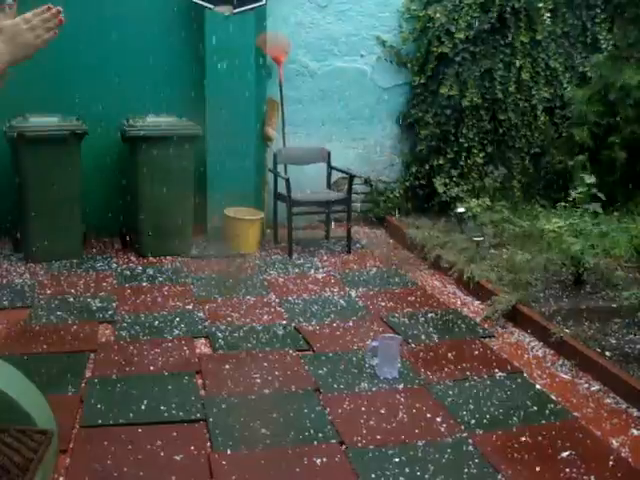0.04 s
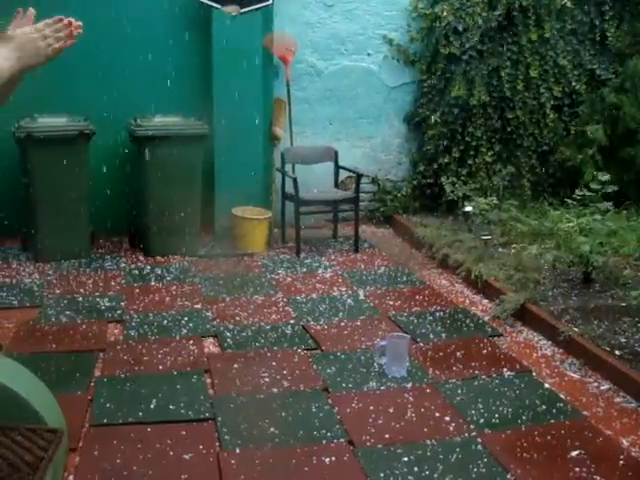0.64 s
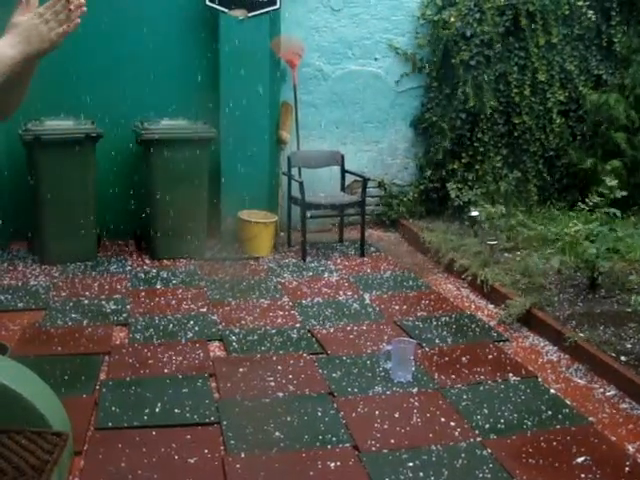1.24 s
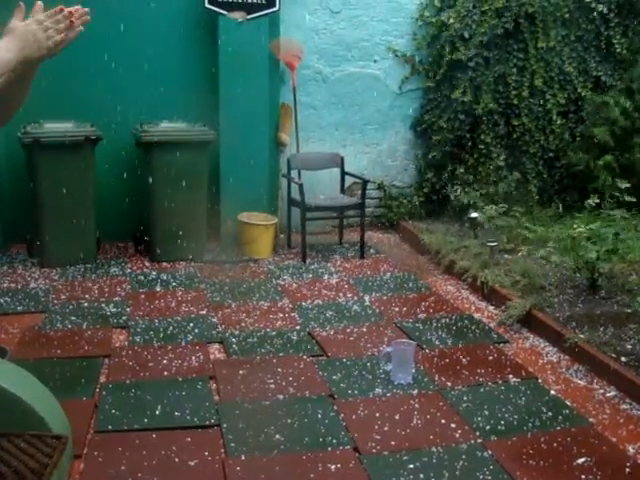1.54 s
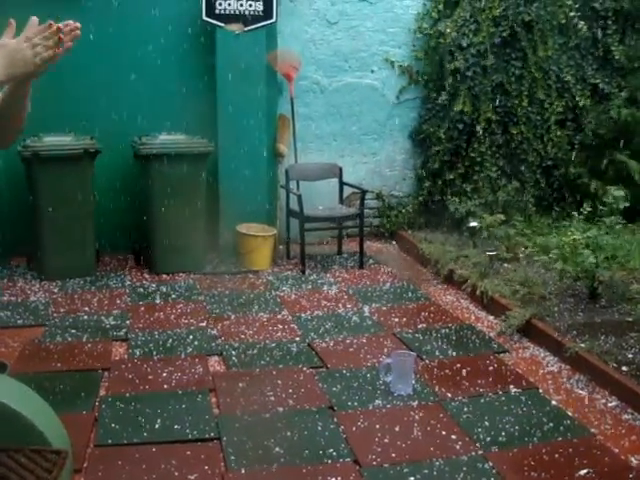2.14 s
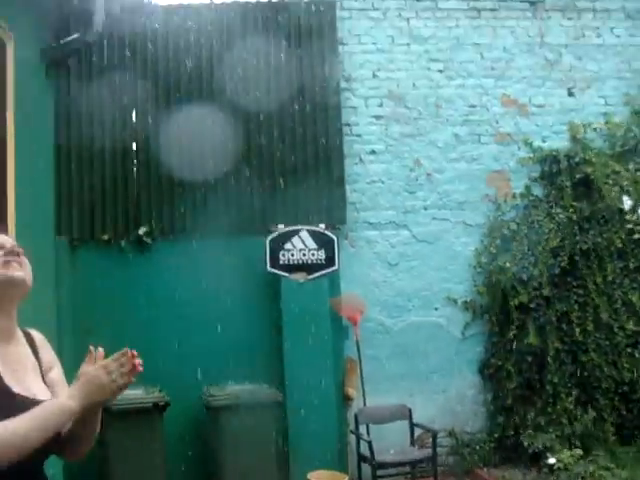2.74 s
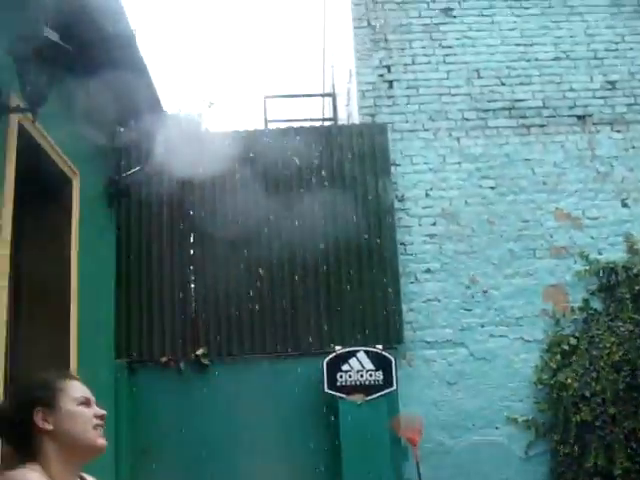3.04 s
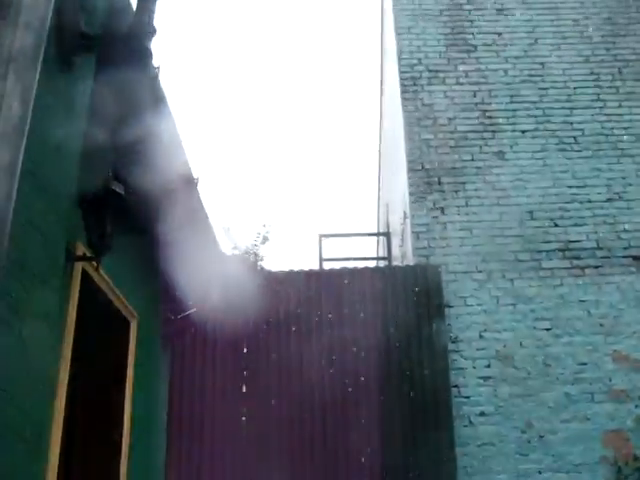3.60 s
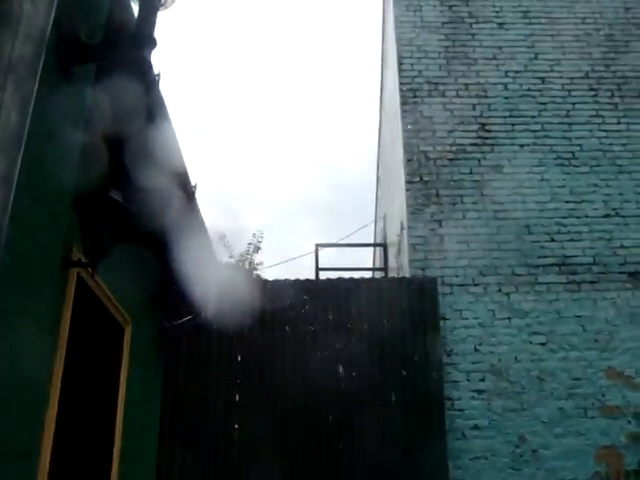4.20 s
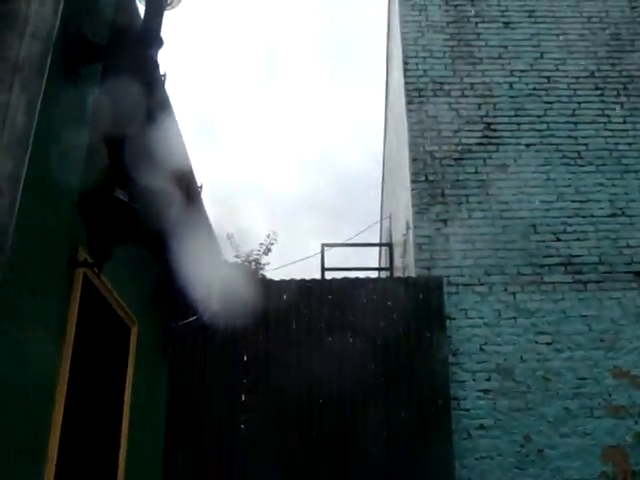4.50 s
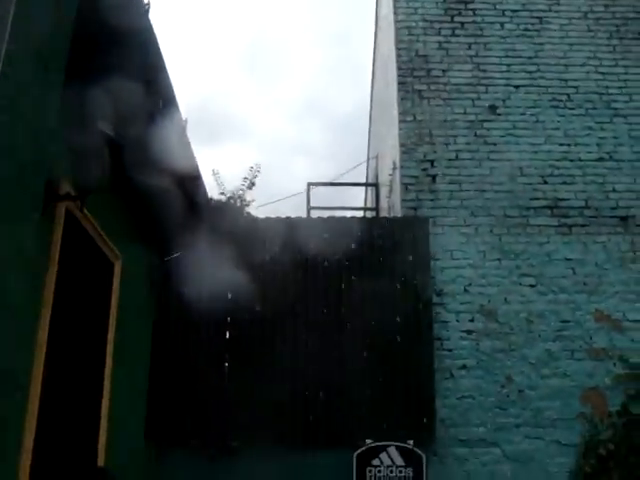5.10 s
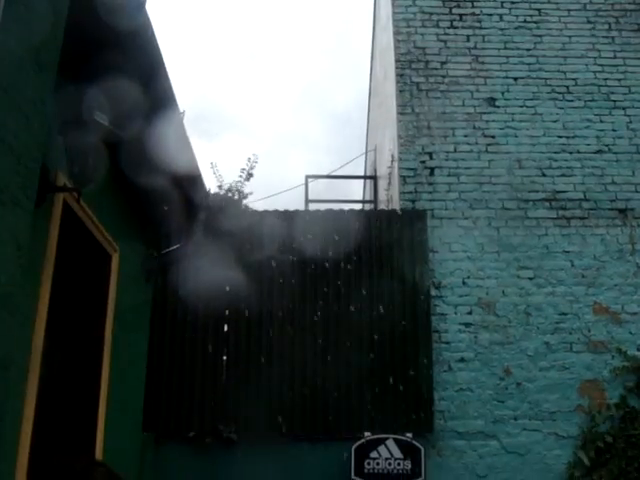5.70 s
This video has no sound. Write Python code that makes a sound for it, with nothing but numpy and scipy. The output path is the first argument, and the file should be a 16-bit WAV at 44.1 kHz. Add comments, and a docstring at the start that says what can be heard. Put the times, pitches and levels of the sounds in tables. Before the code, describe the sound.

Hail and rain fall steadily for the whole six seconds in a small walled courtyard, heard from under the eaves. Stones tick and shatter densely on the paving over a bright, wet spatter of drops, and the walls blur distant impacts into a wash. Underneath are softer hollow drumming on plastic bins and dull thuds on tiles and leaves. Larger stones crack sharply close to the microphone throughout, some with a small knock, clustering between 1 and 1.5 seconds and again from 4 to 5 seconds. Brief flurries add heavier patter around 1.3 to 2 seconds, near 4 and 5 seconds, and at about 5.7. Faint wind rumbles on the microphone, mostly in the first two seconds and again near 4.2. A thin, very high ring briefly peeks through the hiss at about 0.2 and 2.1 seconds. The overall level stays nearly even.

```python
"""Hail and rain in a small walled courtyard, heard in mono from a microphone under the eaves.
Stones tick and shatter on the paving, drum on plastic bins and thud on tiles and leaves; big ones
crack close by. Raindrops spatter in the wet, and the walls blur the far impacts into a wash.
A little wind rumbles on the microphone, and a thin high ring comes up twice."""
import sys
import numpy as np
from scipy import signal
from scipy.fft import rfft, irfft
from scipy.io import wavfile
from scipy.ndimage import uniform_filter1d

SR = 44100
rng = np.random.default_rng(int(sys.argv[2]) if len(sys.argv) > 2 else 0)


def master_out(mix):
    """Clip the mix to full scale and print it as 16-bit PCM to the path in sys.argv[1]."""
    frames = np.transpose(np.atleast_2d(mix))
    ceiling = np.clip(frames, -1, 1)
    pcm = np.round(ceiling * 32767).astype(np.int16)
    wavfile.write(sys.argv[1], SR, pcm)


N = 262395
T = np.arange(N) / SR


def undb(db):
    """Decibels to gain."""
    return 10 ** (np.asarray(db) / 20)


def unit(x):
    """Scale to rms 1."""
    return x / np.sqrt(np.mean(x ** 2))


def curves(table):
    """Each column after the first, which is time in seconds, as one value per sample."""
    times, *columns = np.transpose(table)
    return [np.interp(T, times, column) for column in columns]


def walk(rate):
    """Glide from one random level to the next, rate times a second; rms 1."""
    hold = max(int(SR / rate), 2)
    steps = np.repeat(rng.standard_normal(N // hold + 1), hold)
    return unit(uniform_filter1d(steps, hold)[:N])


def band(x, lo_hz, hi_hz, order=3):
    """Butterworth band-pass."""
    return signal.sosfilt(signal.butter(order, [lo_hz, hi_hz], "band", fs=SR, output="sos"), x)


def resonance(x, hz, width_hz):
    """Two-pole band-pass, gain 1 at the centre."""
    return signal.lfilter(*signal.iirpeak(hz, hz / width_hz, fs=SR), x)


def colour(x, points, size=2048):
    """Minimum-phase filter through (Hz, dB) points, so that clicks keep their sharp front."""
    hz, db = np.transpose(points)
    grid_hz = np.maximum(np.fft.rfftfreq(size, 1 / SR), 1)
    gain = undb(np.interp(np.log(grid_hz), np.log(hz), db))
    cepstrum = irfft(np.log(gain))
    cepstrum[1:size // 2] *= 2
    cepstrum[size // 2 + 1:] = 0
    response = irfft(np.exp(rfft(cepstrum)))
    return signal.fftconvolve(x, response)[:N]


def fade(x, t60):
    """Energy that jumps with each hit in x, then falls 60 dB in t60 seconds."""
    keep = np.exp(-2 * np.log(1000) / (t60 * SR))
    return signal.lfilter([1 - keep], [1, -keep], x ** 2)


def impacts(rate, spread_db, range_db):
    """Random hits, rate a second; the nearest stand up to range_db above the farthest."""
    lands = rng.random(N) < rate / SR
    nearness = rng.exponential(size=N)
    sign = rng.choice([-1, 1], N)
    return lands * sign * undb(range_db * np.tanh(spread_db * nearness / range_db))


def courtyard(x, t60, wet_db):
    """Every impact lands elsewhere, so the walls answer each with a different diffuse tail."""
    return unit(x + undb(wet_db) * np.sqrt(fade(x, t60)) * rng.standard_normal(N))


def hail(rate_per_band=1500, waver_db=1.0, shatter_db=-3.0, bands=8):
    """Stones tick on the paving, small ones higher, each size wavering on its own; some shatter."""
    # Tone of the paving. Each row: frequency in Hz, gain in dB.
    paving = [(300, -26), (800, -7), (1100, -5), (1700, -1.5), (2500, 1), (3600, -1.5), (4800, -2.5),
              (6000, -11), (10000, -35)]
    ticks, edges_hz = 0, np.geomspace(600, 9000, bands + 1)
    for lo, hi in zip(edges_hz, edges_hz[1:]):
        hits = impacts(rate_per_band, spread_db=4.5, range_db=13.5) * undb(waver_db * walk(70))
        ticks += band(courtyard(hits, t60=0.48, wet_db=-2), lo, hi)
    breaks = fade(impacts(330, spread_db=1.0, range_db=14.5), t60=0.054)
    chips = unit(impacts(9000, spread_db=1.0, range_db=10) * np.sqrt(breaks))
    return unit(colour(ticks + undb(shatter_db) * chips, paving))


def rain(droplet_rate=9000, splash_t60=0.016, big_db=-4, bands=6):
    """Each splash throws a dying burst of droplets; small ones keep to one band, big ones cover all."""
    # Tone of drops in the wet. Each row: frequency in Hz, gain in dB.
    spatter = [(2000, -7.5), (3600, -13.5), (4700, -4), (5800, -2.5), (7300, 1), (8400, -2), (9800, -3),
               (11000, -27.5)]
    splashes, edges_hz = 0, np.linspace(3200, 10400, bands + 1)
    big = fade(unit(impacts(420, spread_db=23, range_db=17.5)), splash_t60)
    for lo, hi in zip(edges_hz, edges_hz[1:]):
        small = fade(unit(impacts(300, spread_db=4.0, range_db=1.0)), splash_t60)
        bursts = np.sqrt(small + undb(big_db) * big)
        droplets = impacts(droplet_rate, spread_db=4.0, range_db=10.0) * bursts
        splashes += band(unit(droplets), lo, hi)
    return unit(colour(splashes, spatter))


def bins(rate_per_mode=600):
    """Hail drums on the hollow plastic bins; each spot on a lid favours other modes."""
    # Modes of the lids. Each row: frequency in Hz, width in Hz, relative gain in dB.
    lid_modes = [(516, 170, 1), (648, 130, 3.5), (767, 31, -3.5), (946, 92, -15)]
    lids = 0
    for hz, width_hz, db in lid_modes:
        hits = impacts(rate_per_mode, spread_db=4.0, range_db=14.5)
        lids += undb(db) * resonance(courtyard(hits, t60=0.19, wet_db=-0.5), hz, width_hz)
    return unit(lids)


def thuds(rate=450):
    """Hail lands in dull blows on tiles and leaves."""
    # Tone of the blows. Each row: frequency in Hz, gain in dB.
    dull_tone = [(45, -39.5), (80, -9.5), (120, -2.5), (190, 0.5), (260, 0.5), (340, -5), (500, -3.5),
                 (1000, -17.5)]
    hits = courtyard(impacts(rate, spread_db=2.0, range_db=19), t60=0.46, wet_db=-7.5)
    return unit(colour(hits, dull_tone))


def surges(slow_hz=5, fast_hz=24):
    """Quick random swells and lulls in the shower; rms 1."""
    return unit(band(rng.standard_normal(N), slow_hz, fast_hz, order=2))


def wind(buffet_db=2.0, buffet_rate=14):
    """Wind on the microphone: a low rumble in uneven buffets."""
    # Strength of the breeze. Each row: time in seconds, level in dB before the buffets.
    breeze = [(0, -52), (.28, -46), (.47, -55), (.85, -42.5), (1.0, -49), (1.38, -47), (1.62, -60),
              (1.8, -49), (2.15, -71), (3.0, -65), (4.2, -46.5), (4.5, -57), (5.55, -61), (5.95, -66)]
    # Tone of the rumble. Each row: frequency in Hz, gain in dB.
    rumble_tone = [(18, -33), (30, -10), (55, -8), (80, -1), (140, -3.5), (400, -40)]
    breeze_db, = curves(breeze)
    buffets = undb(breeze_db + buffet_db * walk(buffet_rate))
    return buffets * unit(colour(rng.standard_normal(N), rumble_tone))


def thin_ring(hz=8722, steady_db=-44, ramp_s=0.004):
    """A faint narrow ring high in the hiss, which briefly swells into a clear tone."""
    # Swells of the ring. Each row: start in seconds, length in seconds, peak in dB.
    swells = [(.2, .065, -22.5), (2.1, .04, -23)]
    ring = undb(steady_db) * unit(resonance(rng.standard_normal(N), hz, width_hz=35))
    for start, length, db in swells:
        gate = np.clip(np.minimum(T - start, start + length - T) / ramp_s, 0, 1)
        ring += undb(db) * gate * np.sin(2 * np.pi * hz * T)
    return ring


def big_stones(decay_s=0.0053, knock_s=0.0058, knock_hz=620, size=2048):
    """Close to the microphone a stone cracks, scatters chips and knocks the surface it lands on."""
    # Near stones. Each row: start in seconds, peak of the crack in dB, its pitch in Hz,
    # knock in dB relative to the crack.
    stones = [(.315, -16, 1750, -7), (.381, -12, 3000, -19), (.787, -9, 2000, -10.5),
              (1.021, -11, 3200, -20), (1.155, -12.5, 2040, -20), (1.195, -12, 2340, -22),
              (1.215, -8, 3200, -12), (1.304, -5, 7100, -24), (1.371, -7.5, 2820, -20),
              (1.496, -6, 2150, -10), (1.852, -13, 3470, -13), (1.994, -14, 2400, -7),
              (2.229, -11, 3190, -19), (2.496, -11, 2600, -17), (2.964, -10, 6500, -14),
              (3.085, -9.5, 2390, -11), (3.26, -11, 2330, -20), (3.483, -11, 2900, -20),
              (3.583, -10, 2670, -13), (3.98, -9, 2200, -18), (4.094, -11, 2970, -20),
              (4.25, -11, 2800, -13), (4.434, -6, 4500, -28), (4.517, -10, 7310, -22),
              (4.535, -7, 4300, -24), (4.748, -15.5, 1970, -7), (4.865, -7, 2630, -18),
              (5.003, -9, 2300, -17), (5.177, -12.5, 1830, -19), (5.708, -10, 2280, -18)]
    out, t = np.zeros(N + size), T[:size]
    for start, db, hz, knock_db in stones:
        chips = rng.standard_normal(size) * np.exp(-t / decay_s)
        crack = band(chips, 0.54 * hz, 1.3 * hz, order=2)
        crack /= np.abs(crack).max()
        surface_hz = knock_hz * rng.uniform(0.75, 1.25)
        knock = np.sin(2 * np.pi * surface_hz * t) * np.exp(-t / knock_s)
        at = int(start * SR)
        out[at:at + size] += undb(db) * (crack + undb(knock_db) * knock)
    return out[:N]


def flurries():
    """Clumps of hail land together, each a smooth hump; gives the extra dB of clatter and of thuds."""
    # Each row: centre in seconds, width in seconds, extra clatter in dB, extra thuds in dB.
    clumps = [(.69, 0.1, -1, 3), (1.29, .06, 0, 7.5), (1.384, .05, 1.8, 3), (1.518, 0.028, 0, 9),
              (1.858, 0.049, 3, 9.5), (1.994, .05, 4, 7), (3.57, 0.07, 0, 1.5), (3.95, 0.11, 1, 5.5),
              (4.083, 0.028, 1.5, 4), (4.43, 0.098, 2, 1), (4.98, .08, 0, 5), (5.57, .04, 1.5, 1),
              (5.73, 0.17, 1.4, 3)]
    extra_clatter_db, extra_thud_db = 0, 0
    for centre, width, clatter_db, thud_db in clumps:
        hump = 2 ** -((2 * (T - centre) / width) ** 2)
        extra_clatter_db += clatter_db * hump
        extra_thud_db += thud_db * hump
    return extra_clatter_db, extra_thud_db


def scene(hail_surge_db=0.65, rain_surge_db=0.5, thuds_below_db=13.5, thuds_fade_db_per_s=0.53):
    """The courtyard from under the eaves: one shower drives every surface; both channels are alike."""
    # How hard it comes down. Each row: time in seconds, then base levels in dB of hail, rain and bins.
    shower = [(0, -21, -24, -33), (.55, -20, -21.5, -33), (.82, -19.5, -23.5, -33),
              (.95, -22.5, -23.5, -35.5), (1.05, -20.5, -22.5, -31.5), (1.4, -21.5, -23.5, -34.5),
              (1.65, -22, -22.5, -35), (1.93, -23, -24.5, -33.5), (2.1, -21.5, -24, -33.3),
              (2.7, -20.5, -22.5, -34), (3.15, -20.5, -22, -32.4), (3.33, -22.3, -24, -37.7),
              (3.45, -19.5, -22, -34.5), (4.4, -20, -22.5, -32.5), (4.65, -21, -23.5, -34.5),
              (4.95, -19.5, -21.8, -32.6), (5.33, -21, -22, -34.6), (5.95, -20.5, -21.3, -34)]
    hail_db, rain_db, bins_db = curves(shower)
    extra_clatter_db, extra_thud_db = flurries()
    clatter = undb(hail_db + extra_clatter_db) * hail()
    spatter = undb(rain_db) * rain()
    drumming = undb(bins_db + 0.27 * extra_thud_db) * bins()  # the bins take a share of each flurry
    patter = undb(hail_db + extra_thud_db - thuds_below_db - thuds_fade_db_per_s * T) * thuds()
    surge = surges()
    hailfall = undb(hail_surge_db * surge) * (clatter + drumming + patter)
    rainfall = undb(rain_surge_db * surge) * spatter
    mono = hailfall + rainfall + wind() + big_stones() + thin_ring()
    return np.array([mono, mono])


def record(dry, drive=0.87, top_hz=10050):
    """The microphone chain rounds the tallest peaks and cuts the top steeply."""
    rounded = np.tanh(drive * dry) / drive
    lowpass = signal.ellip(14, 0.1, 85, top_hz, fs=SR, output="sos")
    return signal.sosfilt(lowpass, rounded)


dry = scene()
out = record(dry)
master_out(out)
```